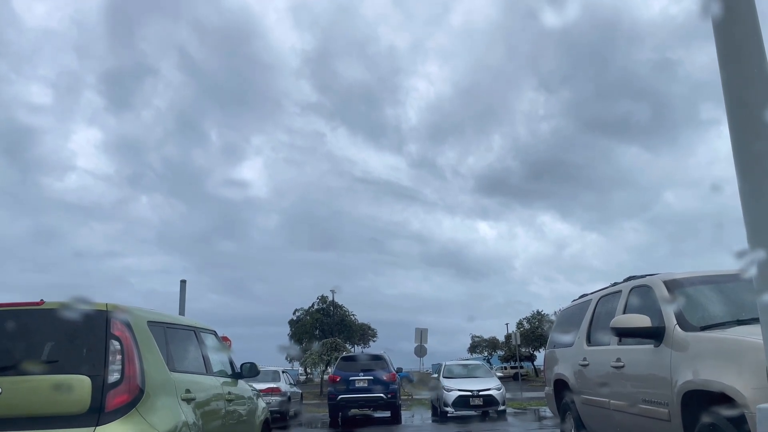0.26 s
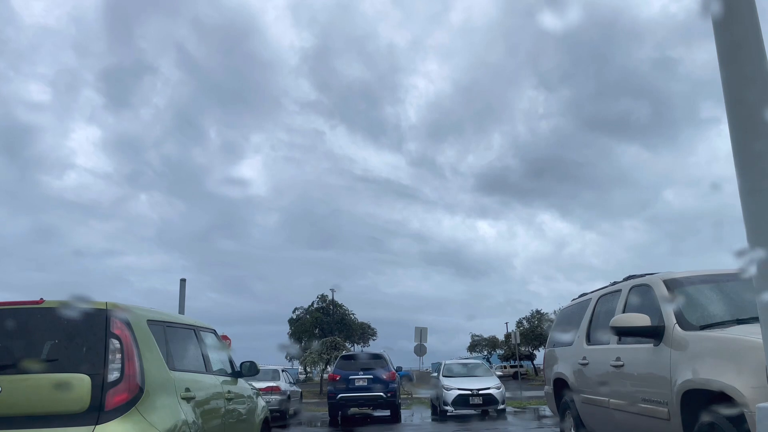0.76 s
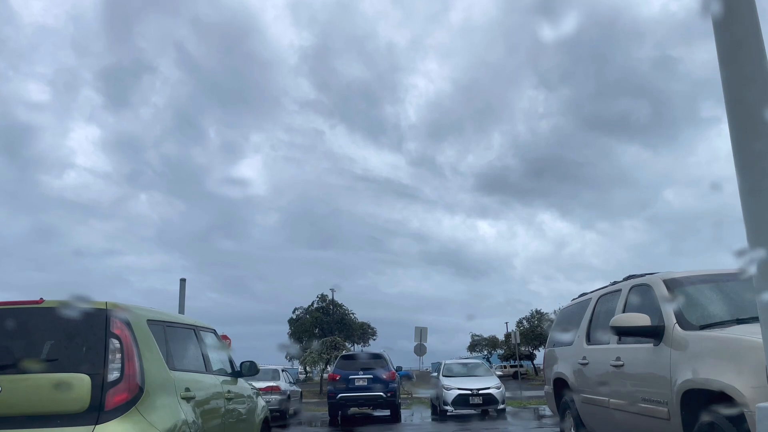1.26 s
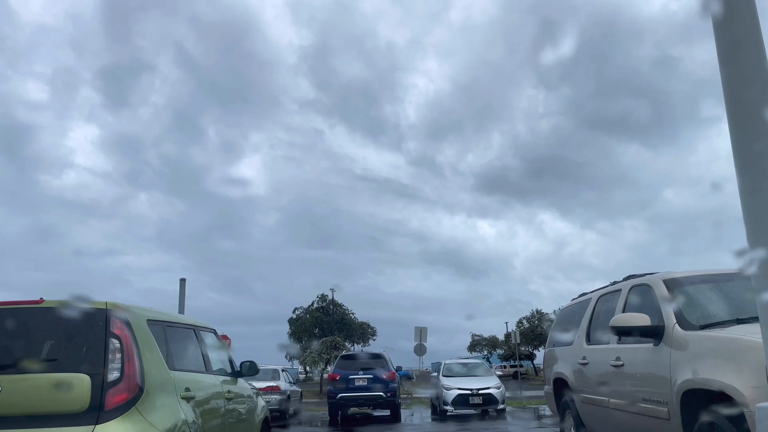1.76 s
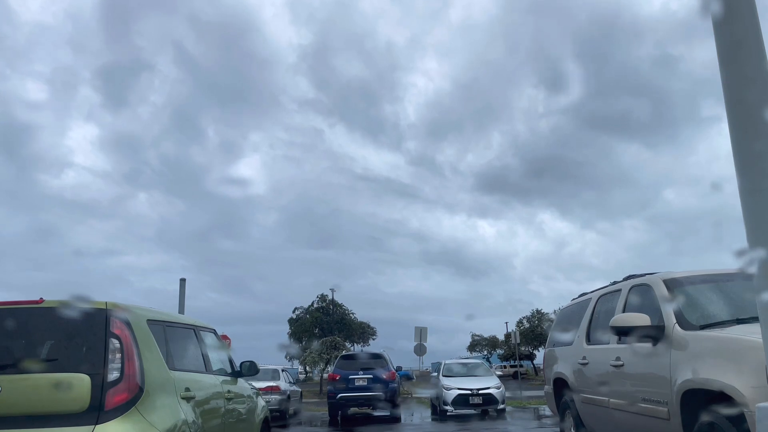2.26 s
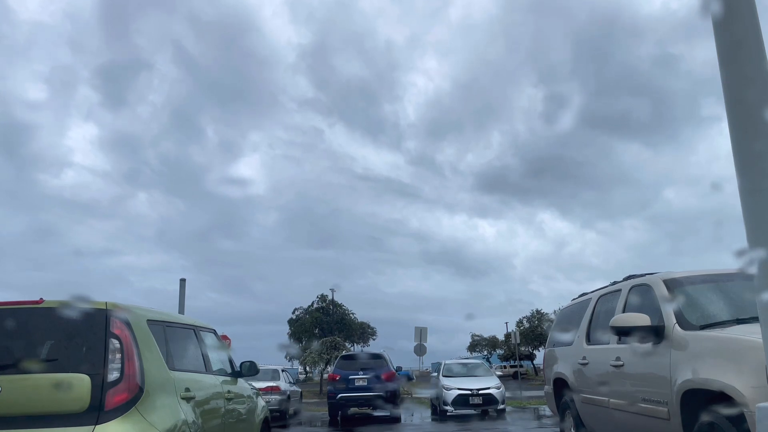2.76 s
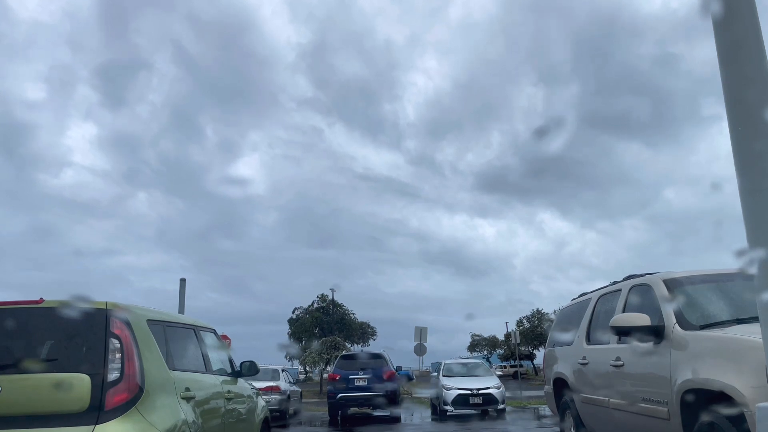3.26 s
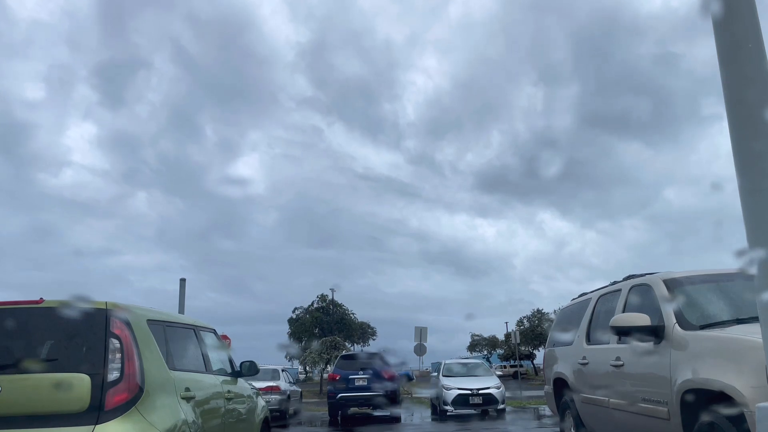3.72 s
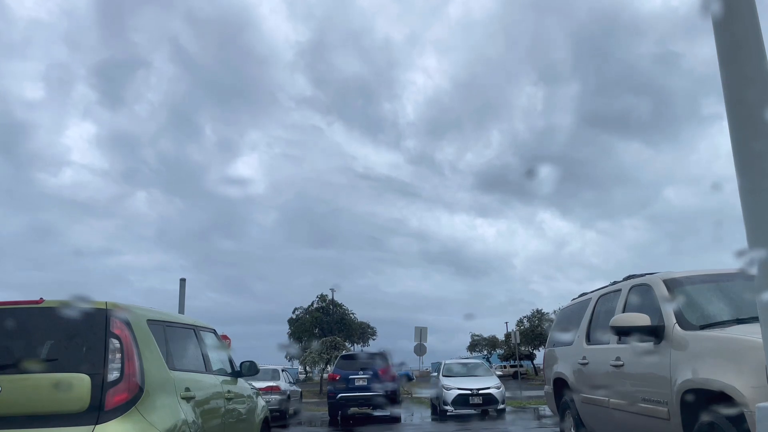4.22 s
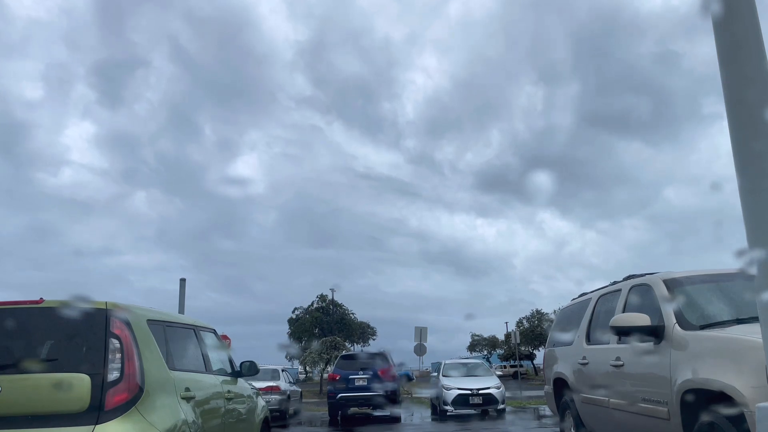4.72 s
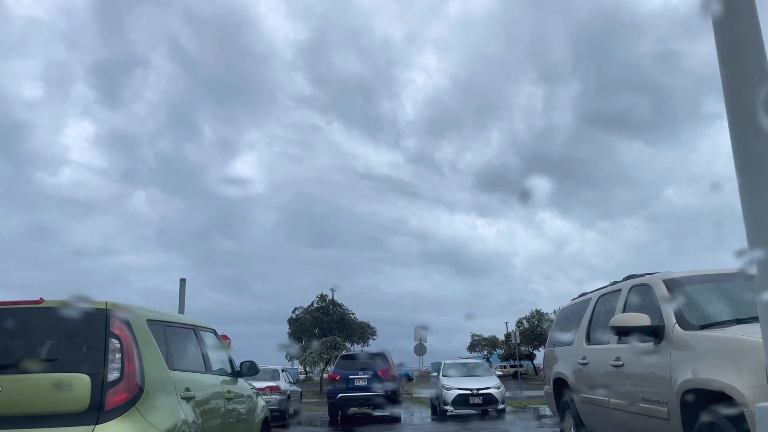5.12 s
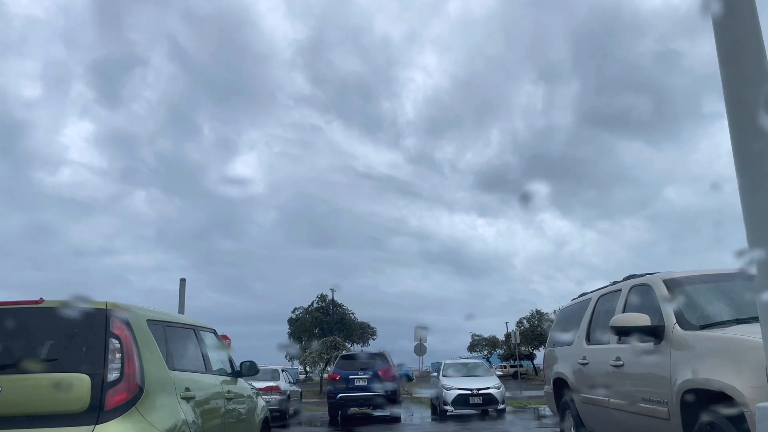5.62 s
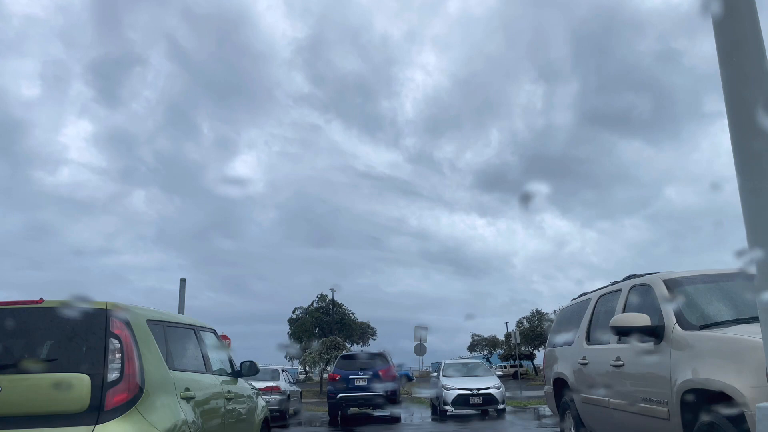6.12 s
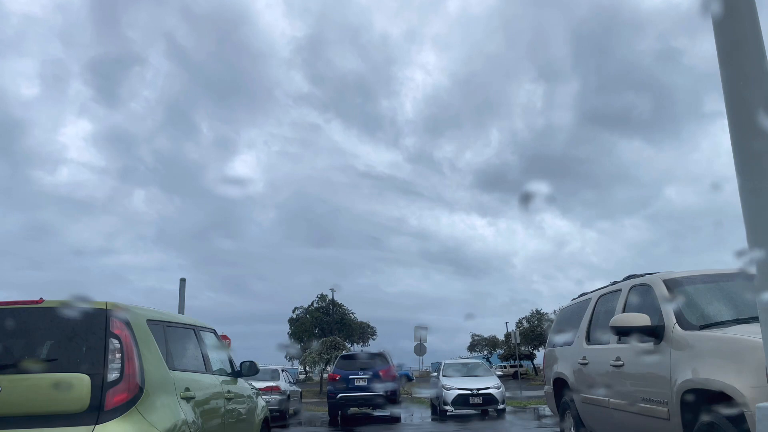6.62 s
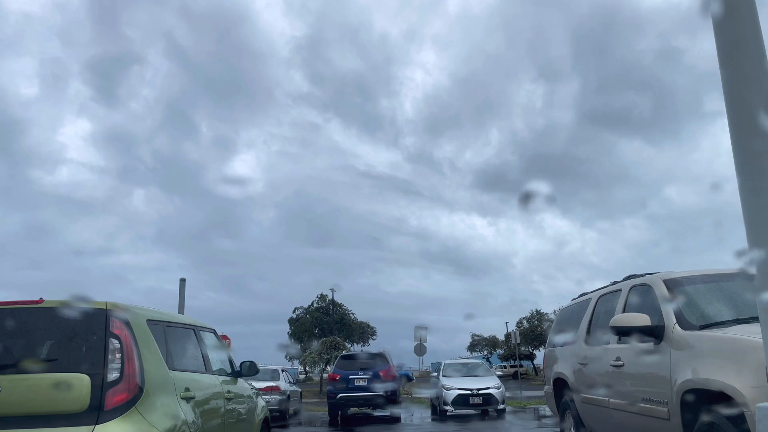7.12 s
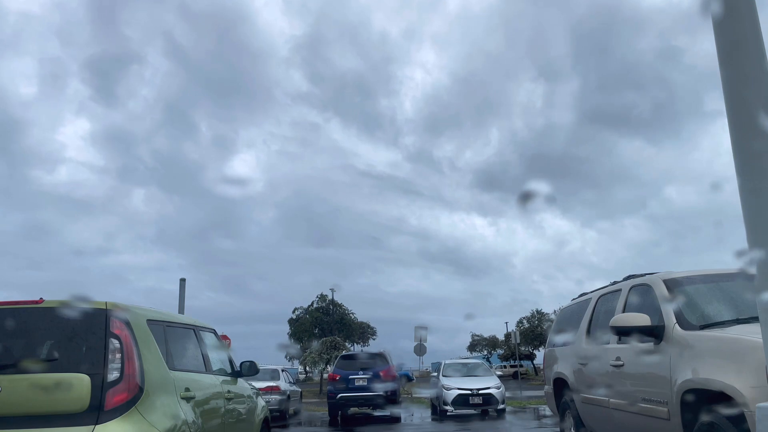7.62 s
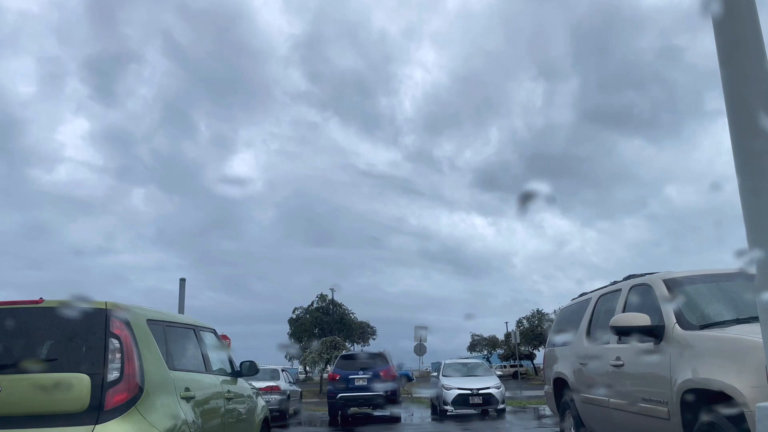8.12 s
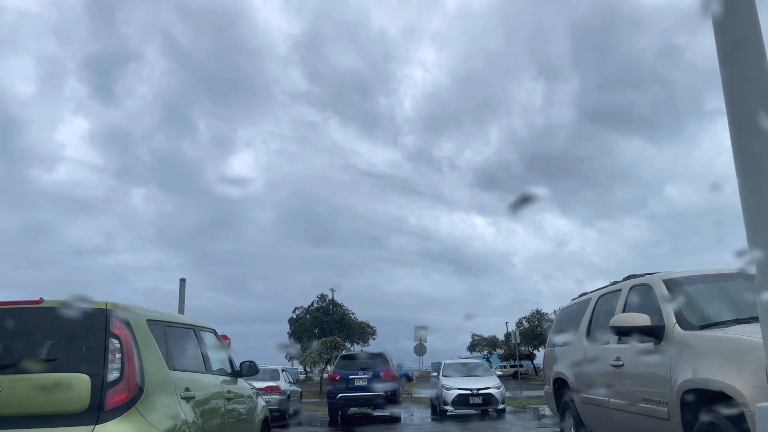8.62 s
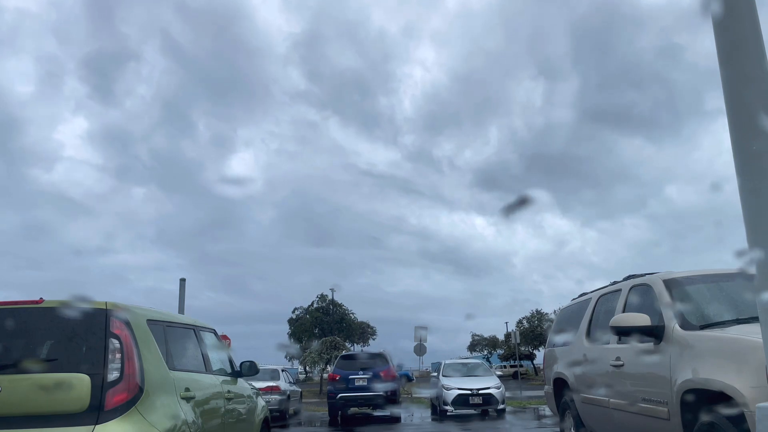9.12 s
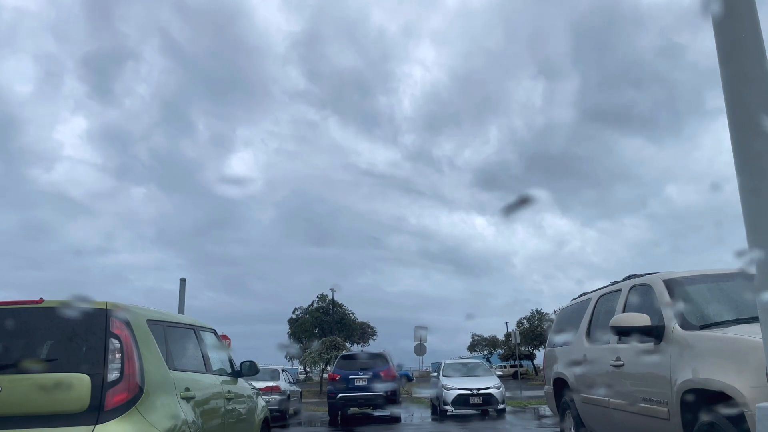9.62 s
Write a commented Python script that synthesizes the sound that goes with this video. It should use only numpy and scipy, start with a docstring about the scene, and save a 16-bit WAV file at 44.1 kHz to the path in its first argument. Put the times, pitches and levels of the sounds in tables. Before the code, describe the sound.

A vehicle hisses away on wet road, rain ticks on a windshield, then bumps, a faint squeak and sharp plastic knocks sound inside the car.

```python
"""Hard, plastic-sounding knocks close by, inside a parked car in light rain: chains of tiny impacts ring a panel.
Around them come soft bumps, a faint squeak and rustling of slipping surfaces, and a short rattle of ringing modes.
Small drops, bursts of coloured noise, tick on the windshield; outside, shaped noise makes a wash of rain.
A vehicle hisses by on the wet road a few metres off, trailing spray, and fades with distance.
Narrow bands of noise fill the closed cabin with a low rumble, and a far motor hums in sine tones."""
import sys
import numpy as np
from scipy import signal
from scipy.fft import rfft, irfft, next_fast_len
from scipy.io import wavfile
from scipy.ndimage import uniform_filter1d, map_coordinates

SR = 44100
rng = np.random.default_rng(int(sys.argv[2]) if len(sys.argv) > 2 else 0)


def wav_record(signal):
    """Record a signal, one row per channel, as 16-bit PCM in the file named by sys.argv[1]."""
    frames = np.transpose(np.atleast_2d(signal))
    bounded = np.clip(frames, -1, 1)
    # unit amplitude maps onto the largest positive 16-bit level
    quanta = np.round(bounded * 32767).astype(np.int16)
    wavfile.write(sys.argv[1], SR, quanta)


N = 435266

# Rumble of the traffic around the car park. Each row: time in seconds, reference level in dB.
TRAFFIC_LEVEL = [(0, -38.5), (1.8, -29.5), (2.25, -36.5), (2.9, -31.5), (3.7, -36.5), (5.9, -37),
                 (6.4, -33.5), (6.6, -41.5), (7.9, -41.5), (8.7, -40.5), (9.87, -41.5)]
# Colours of the outside sounds. Each row: frequency in Hz, relative level in dB.
BOOM_COLOUR = [(30, -81), (50, -12), (58, 9), (64, 19.5), (70, 14), (78, 7.5), (92, -12), (130, -77.5)]
DEEP_COLOUR = [(12, -28), (25, -17), (34, -15.5), (43, 7), (51, 12), (58, 1), (75, -54), (110, -93.5)]
ROAD_COLOUR = [(60, -64.5), (92, -2.5), (116, 5), (140, -6), (180, -4.5), (215, -9), (285, -7.5),
               (340, -9.5), (430, -19), (560, -30), (900, -28.5), (2000, -82.5)]
TYRE_COLOUR = [(250, -36.5), (480, -15), (700, -0.5), (900, 1), (1170, 6.5), (1380, -2), (1700, -2.5),
               (2300, -5.5), (2600, -10.5), (3300, -6), (4500, -17.5), (6200, -25), (7500, -54),
               (12000, -65)]
DRIZZLE_COLOUR = [(250, -26), (500, -4.5), (700, 1.5), (1100, -15.5), (1350, -1), (1650, -8), (2300, -9),
                  (3300, -16.5), (4400, -17), (5500, -18), (6600, -24.5), (7600, -37.5), (10000, -29),
                  (13500, -40.5)]
# Cabin resonances that colour the outside hiss. Each row: centre in Hz, width in Hz, relative level in dB.
CABIN_MODES = [(862, 56, 5.5), (1065, 74, 5.5), (1171, 52, 4), (1560, 140, -3), (1674, 44, -6),
               (1894, 25, -2), (2230, 140, -7), (2296, 25, -3.5), (2920, 150, -8.5), (3360, 29, -14.5),
               (4730, 480, -23.5), (6260, 74, -26.5)]
# Far motor. Each row: time in seconds, firing rate in Hz.
MOTOR_RATE = [(0, 66.1), (1.2, 65.1), (2.2, 65.54), (2.95, 68.94), (3.3, 75.8), (4.4, 81.4), (5.3, 75.97),
              (5.7, 70.2), (6.3, 69.14), (7, 64.22), (9.87, 61.91)]
# Its tones. Each row: multiple of the firing rate, level in dB relative to TRAFFIC_LEVEL.
MOTOR_TONES = [(1, -8.5), (2, -22.5), (4, -24)]
# Left-right likeness of outside, then close noise. Each row: frequency in Hz, correlation from -1 to 1.
FAR_LIKENESS = [(60, 1), (130, 0.9), (280, 0.27), (600, -0.23), (1150, -0.71), (1700, 0.24), (2800, 0.66),
                (6000, -0.14), (12800, 0.68)]
NEAR_LIKENESS = [(60, 0.86), (200, .76), (400, 0.35), (1100, 0.095), (2000, 0.73), (4000, 0.56),
                 (6000, 0.33), (7300, 1), (9300, 0.32), (11000, 0.93), (12800, 0.94)]
# Left-right balance of outside, then close sounds. Each row: frequency in Hz, left minus right in dB.
FAR_BALANCE = [(60, -0.2), (130, 5.5), (200, -2.5), (330, 0), (550, 2.5), (1150, -3), (2000, 2.5),
               (4000, 1.4), (8000, 1)]
NEAR_BALANCE = [(60, -1.5), (160, 0.5), (400, 2.5), (1300, 0), (1850, -6), (2250, 1.5), (3200, 2),
                (4300, 2), (6000, 1), (8000, 0)]
# Left-right phase turn of the close sounds; above about 6 kHz it comes from the stereo recorder. Each row:
# frequency in Hz, left minus right phase in radians.
NEAR_PHASE_TURN = [(200, 0), (700, 1.07), (1100, 0.56), (1550, 1.4), (2100, 0.5), (2900, 1.4),
                   (4500, 0.27), (5600, -0.35), (6300, -2.5), (7000, -3), (7900, -3), (9000, -4.5),
                   (10400, -5.5), (11800, -7), (13000, -8.5)]
# Biggest drops on the glass. Each row: start in seconds, level in dB before a shared trim,
# brightness in dB per octave.
BIG_DROPS = [(.545, -58, -13.5), (.669, -59.5, -11), (1.526, -64.5, -4.5), (1.558, -58, -3.5),
             (2.051, -66, -11), (2.191, -62, -6), (2.217, -67, -10), (2.807, -67, -11), (2.847, -57.5, -13),
             (3.06, -70, -7), (3.136, -74, -10), (3.272, -59, -10), (3.633, -54.5, -11), (3.951, -58, -8.5),
             (4.018, -61.5, -7), (4.156, -58, -8.5), (4.486, -67, -6.5), (4.553, -73, -3), (4.952, -71, -5),
             (5.254, -60, -8.5), (5.75, -60.5, -6.5), (6.014, -58.5, -11), (6.047, -59, -2.5),
             (6.109, -61.5, -9), (6.151, -61.5, -5.5), (6.201, -66, -4), (6.297, -68, -14),
             (6.802, -73, -6), (6.901, -55, -12), (7.016, -58.5, -15.5), (7.086, -56.5, -6),
             (7.582, -63, -6.5), (7.853, -59.5, 1.5), (7.879, -58.5, 1.5), (8.502, -62, -8),
             (8.565, -52, -12.5), (9.635, -53, -9)]
# Colour of a drop, and of a knock's first crack. Each row: frequency in Hz, relative level in dB.
SPLAT_COLOUR = [(200, -22.5), (700, -5.5), (2000, -5), (3500, 0), (5600, -2.5), (6700, -7), (7600, -9),
                (9500, -8), (12500, -16.5), (14500, -18)]
# Heavy bumps that rock the car's body. Each row: start in seconds, level in dB.
BODY_JOLTS = [(4.833, -25.5), (8.131, -28.5), (9.279, -38)]
# Surfaces rubbing close by. Each row: start in seconds, length in seconds, level in dB.
RUB_EVENTS = [(2.55, 0.22, -63), (3.82, 0.13, -64), (4.681, 0.22, -65.5), (8.101, 0.45, -56),
              (9.206, 0.23, -54)]
# Colour of the rubbing. Each row: frequency in Hz, relative level in dB.
RUB_COLOUR = [(300, -3), (900, 12), (2000, -0.5), (3300, -2), (5500, -5), (7500, -12), (10500, -24),
              (13500, -19)]
# Nudges to a loose part. Each row: start in seconds, level in dB before the levels of its modes.
RATTLE_NUDGES = [(8.217, -50), (8.256, -45), (8.319, -44.5), (8.347, -38), (8.375, -48), (8.403, -40.5)]
# Modes of the loose part. Each row: frequency in Hz, relative level in dB, 60 dB decay in seconds.
LOOSE_MODES = [(219.2, 7.5, 0.22), (605, 0, 0.1), (682, 1.5, 0.13), (1095, -3.5, 0.061), (1126, -1, 0.13),
               (2360, -8.5, 0.1)]
# Bumps and knocks close by, all levels before shared trims. Each row: start in seconds,
# contact length in seconds, level in dB, brightness in dB per octave, low thud in dB,
# strongest ring in Hz, its level in dB, left minus right in dB.
KNOCK_EVENTS = [(2.562, .01, -56.5, -4, -38.5, 1440, -52, 4), (2.577, .005, -67, -9, -34, 377, -31, 1),
                (2.589, 0.001, -57, -6, -34, 585, -36, 0.5),
                (2.605, 0.0018, -59.5, -12, -34.5, 119, -26.5, -2),
                (2.621, 0.0068, -71, -2, -31, 296, -30, 2),
                (2.63, 0.005, -64.5, -17, -37.5, 387, -27.5, -2), (2.647, .002, -70, -7, -39, 250, -31, 0),
                (2.672, 0.0029, -56, 1, -36, 1290, -51, 2), (2.722, .033, -57, 0.5, -33.5, 3970, -52, 3),
                (2.75, 0.0034, -80, -16, -41, 310, -30, 2.5), (2.777, 0.004, -76.5, -4, -41, 210, -35.5, 4),
                (2.787, 0.0018, -78, -12, -40, 99, -19, -2), (3.87, .027, -63.5, -1, -41.5, 3940, -49, 3.5),
                (3.895, 0.0205, -74, -8, -49, 392, -44, 0),
                (4.619, 0.0068, -68.5, -0.5, -43.5, 452, -47, 1),
                (4.694, .016, -65, -10, -51, 1160, -47, -1), (4.708, 0.0165, -73, -11, -46.5, 476, -37, 4),
                (4.737, .012, -74.5, -12, -51.5, 490, -50, -5), (4.77, .008, -74, -11, -42, 590, -49, 3),
                (4.785, 0.0049, -76, -12, -42, 156, -28, 6), (4.804, .036, -63.5, -1.5, -41, 563, -47, 8.5),
                (4.861, .012, -80, -9, -35, 130, -36.5, 6), (7.206, 0.0024, -46.5, -3, -42, 1980, -54, 3),
                (7.211, 0.0028, -64, -10, -39.5, 353, -32, 3),
                (7.284, .013, -37, -0.6, -40, 4100, -44, 4.5),
                (7.288, .00385, -46.5, -1, -45, 1410, -30, 7),
                (7.308, 0.00984, -50.5, -4, -42.5, 640, -32, 2),
                (8.099, 0.0013, -58, -3, -46, 673.3, -52, 6), (8.11, 0.025, -63, 4.5, -48, 2400, -60, -1),
                (8.127, 0.0033, -44, -4, -37, 1160, -43, 4.5),
                (8.133, .024, -44.5, -1.8, -33.5, 2170, -45, 0),
                (8.214, .0067, -49.5, -8.5, -31, 1040, -35, 4.5),
                (8.217, 0.0018, -59, -12, -47, 288, -26.5, 0),
                (8.237, 0.0037, -44.5, 0, -39, 5370, -39, 1.5), (8.25, .012, -52.5, -4, -34, 630, -28, 4),
                (8.276, 0.028, -62, -8, -46, 1118, -45, 0), (8.31, 0.01, -50, -6, -34.5, 615, -48, 5),
                (8.34, .002, -50, 1, -46, 5530, -39, 5), (8.342, 0.00317, -45, -1.5, -47, 2770, -32, 2),
                (8.365, 0.037, -59, -6, -49, 1094, -51, 6),
                (8.403, 0.0041, -49, -6.5, -39.5, 560, -33.5, 1),
                (8.947, 0.0019, -33, 2.5, -35.5, 5260, -21, 1),
                (8.948, 0.0023, -47.5, -8.5, -31.5, 1780, -17, -5),
                (8.974, 0.004, -40, 1, -49, 5230, -38, -8), (8.99, 0.058, -48.5, -4.5, -54, 1940, -52, -3),
                (9, 0.013, -61.5, -9, -49, 164, -37, 3),
                (9.071, .0063, -41.5, -4.5, -51.5, 2080, -46, -1.5),
                (9.122, 0.038, -61, -6, -61.5, 2250, -56, -2),
                (9.227, 0.022, -53.5, -5.5, -57, 3070, -57, -4.5),
                (9.263, 0.0048, -34, 0.5, -48.5, 4040, -26, -9), (9.273, 0.002, -32, -2, -35, 3410, -17, 2),
                (9.277, .004, -30.5, -1, -29, 1850, -17.5, -3),
                (9.287, 0.0033, -45, -4, -36.5, 440, -28, -3),
                (9.306, .003, -52, -9, -39.5, 171, -32.5, -5),
                (9.359, 0.0011, -37, -3.5, -40, 1700, -17, -4.5),
                (9.38, .004, -48.5, -3, -31.5, 405, -30, -2),
                (9.408, 0.00084, -44, -2, -44, 1650, -25, -4.5),
                (9.4192, .002, -31, -1, -36, 3360, -25, -6.5), (9.428, 0.0038, -46, -1, -39, 528, -28.5, 1)]
# Ring of the struck panel. Each row: centre in Hz, width in Hz, relative level in dB.
PANEL_MODES = [(205, 24, -1.5), (318, 34, -9), (437.4, 88, 5), (559, 50, -2.5), (670, 35.5, 1),
               (749, 18, -4), (870, 47, -8.5), (1145, 40, 0.5), (1341, 26, 2.5), (1480, 65, -1.5),
               (1680, 37, 0), (1880, 46, -4), (1970, 70, -0.5), (2177, 130, -1), (2710, 63, -4),
               (3363, 25, 3), (3440, 28, -5.5), (3870, 23, 2), (4400, 59, -7.5), (4960, 48, 3),
               (5240, 50, 3), (5300, 45, 4.5), (5600, 110, -8), (8570, 480, -9), (10260, 460, -23.5)]
# Broad colour of a contact. Each row: frequency in Hz, relative level in dB.
CONTACT_COLOUR = [(40, 4.5), (120, 17.5), (450, 3.5), (1000, 1), (2600, -0.5), (5500, 1), (6500, 1.5),
                  (7600, 0.5), (8800, -5), (10500, -5.5), (12500, -9.5), (14200, -14.5)]
# Decay inside the cabin. Each row: frequency in Hz, 60 dB decay in seconds.
CABIN_DECAY = [(100, 0.12), (400, 0.12), (1500, 0.075), (5000, 0.091), (12000, 0.026)]
# Thud, knock, clack and snap. Each row: low edge in Hz, high edge in Hz, build-up in seconds,
# lag in seconds, gain in dB, share of the panning.
REGISTERS = [(80, 330, 0.011, 0.00703, -0.5, 0.13), (259, 934, 0.0045, 0.003064, -1, 0.92),
             (820, 3230, 0.0015, 0.00042, 1.5, 0.45), (2660, 14300, 0.00093, 0.0016, 4.5, 0.0078)]

PASS_S, PASS_M, SPEED_M_PER_S = 0.21, 6.36, 9.86  # passing vehicle: time and distance when nearest, speed
IDLE_HZ, IDLE_DB = 110.5, -61  # hum of an idling engine
TOP_HZ = 13700  # microphone's band limit


def amp(db):
    """Gain for a level in dB."""
    return 10 ** (np.asarray(db) / 20)


def unit(x):
    """Scale a signal to rms 1."""
    return x / np.sqrt(np.mean(x ** 2) + 1e-20)


def die_away(t, t60):
    """Exponential decay that falls 60 dB in t60 seconds."""
    return amp(-60 * t / t60)


def build_up(t, rise_s):
    """Exponential approach to full level."""
    return 1 - np.exp(-t / rise_s)


def along(points, hz):
    """Read a (Hz, value) curve on a logarithmic frequency axis."""
    f, v = np.transpose(points)
    return np.interp(np.log(hz + 1), np.log(f + 1), v)


def over_time(rows):
    """Read a (seconds, value) curve at every sample."""
    s, values = np.transpose(rows)
    return np.interp(np.arange(N) / SR, s, values)


def bell(hz, centre_hz, octaves):
    """A smooth hump of height 1 on a logarithmic frequency axis."""
    return np.exp(-(np.log2((hz + 1) / centre_hz) / octaves) ** 2)


def band(hz, low_hz, high_hz, order):
    """Band-pass gain with steep skirts."""
    return 1 / np.sqrt((1 + (low_hz / (hz + 1)) ** order) * (1 + (hz / high_hz) ** order))


def resonances(modes, hz):
    """Summed power response of (Hz, width, dB) modes."""
    return sum(amp(db) ** 2 / (1 + (2 * (hz - centre) / width) ** 2) ** 1.6 for centre, width, db in modes)


def ripple(depth_db, spacing_hz):
    """Many close standing waves: a fixed, irregular gain over frequency."""
    knots = rng.standard_normal(2048)
    return lambda hz: amp(depth_db * np.interp(hz / spacing_hz, np.arange(len(knots)), knots))


def wobble(rate):
    """A smooth random curve with rate knots a second."""
    knots = rng.standard_normal(int(N * rate / SR) + 4)
    return map_coordinates(knots, [np.arange(N) * rate / SR])


def crackle(depth_db, size, rate=1400):
    """A gain that moves in straight lines between random levels, rate of them a second."""
    knots = rng.standard_normal(2048)
    return amp(depth_db * np.interp(np.arange(size) * rate / SR, np.arange(len(knots)), knots))


def filtered(x, response):
    """Filter a signal by a response given over frequency."""
    n = x.shape[-1]
    m = next_fast_len(n + SR // 10)
    return irfft(rfft(x, m) * response(np.fft.rfftfreq(m, 1 / SR)), m)[..., :n]


def noise(gain, alike, size):
    """Stereo noise of rms 1 whose mid and side shares set the left-right likeness."""
    m = next_fast_len(size)
    hz = np.fft.rfftfreq(m, 1 / SR)
    turn = np.arccos(np.clip(along(alike, hz), -1, 1)) / 2
    white = rfft(rng.standard_normal((2, m)))
    mid, side = irfft(white * gain(hz) * [np.cos(turn), np.sin(turn)], m)[:, :size]
    return unit(np.array([mid + side, mid - side]))


def rush(colour):
    """Steady outside noise through the whole scene."""
    return noise(lambda hz: amp(along(colour, hz)), FAR_LIKENESS, N)


def steadied(x, span):
    """Noise with its own slow swells evened out over span seconds."""
    power = uniform_filter1d(np.mean(x ** 2, 0), int(span * SR) + 1)
    return x / np.sqrt(np.abs(power) + 1e-3)


def panned(left_db):
    """Left and right gains for a left-minus-right level."""
    return amp(np.outer([.5, -.5], left_db))


def add(track, s, sound):
    """Mix a sound in at time s."""
    part = track[:, max(round(s * SR), 0):][:, :sound.shape[1]]
    part += sound[:, :part.shape[1]]


def tone(hz, t60, t, attack_s, spread=0.72):
    """One mode rings and dies; its phase differs a little from left to right."""
    phase = 2 * np.pi * rng.random() + spread * rng.standard_normal((2, 1))
    return np.sin(2 * np.pi * hz * t + phase) * die_away(t, t60) * build_up(t, attack_s)


def nearness(lead_s=0):
    """Gain of the passing vehicle: 1 at its nearest, falling as one over distance."""
    along_road_m = SPEED_M_PER_S * (np.arange(N) / SR - PASS_S + lead_s)
    return PASS_M / np.hypot(PASS_M, along_road_m)


def rumble(boom_db=-1.5, deep_db=-8, pass_boom_db=-25, pass_deep_db=-30.0, lead_s=0.22, boom_falloff=3.6):
    """Low engine and road sound throbs in the cabin's lowest air modes; the passing engine leads its tyres."""
    around_db = over_time(TRAFFIC_LEVEL)
    boom = np.hypot(amp(around_db + boom_db), amp(pass_boom_db) * nearness(lead_s) ** boom_falloff)
    deep = np.hypot(amp(around_db + deep_db), amp(pass_deep_db) * nearness())
    return boom * steadied(rush(BOOM_COLOUR), span=.4) + deep * steadied(rush(DEEP_COLOUR), span=0.56)


def hum(hz, db, waver=0.0042, flutter_db=0.47):
    """One slightly unsteady engine tone."""
    phase = 2 * np.pi * np.cumsum(hz * (1 + waver * wobble(5.0))) / SR
    return amp(db + flutter_db * wobble(8)) * np.sqrt(2) * np.sin(phase)


def motor():
    """A far motor speeds up and settles, its tones at multiples of the firing rate; another engine idles."""
    hz, around_db = over_time(MOTOR_RATE), over_time(TRAFFIC_LEVEL)
    return sum(hum(round(k) * hz, around_db + db) for k, db in MOTOR_TONES) + hum(IDLE_HZ, IDLE_DB)


def patchy(x):
    """The wet hiss comes in patches: each band swells and sinks on its own."""
    z = signal.stft(x, nperseg=512)[2]
    across_bands = uniform_filter1d(rng.standard_normal(z.shape[1:]), 7, 0)
    field = uniform_filter1d(across_bands, 12, 1)
    return signal.istft(z * amp(1.5 * unit(field)), nperseg=512)[1][:, :N]


def traffic(drizzle_db=-65, shell_db=5, grain_db=1, road_db=-48.0, pass_road_db=-38, tyres_db=-50.5,
            far_tyres_db=-68, falloff=1.21, lead_s=0.13):
    """Road drone and the hiss of wet tyres fade with distance into the grainy wash of the rain."""
    road_gain = np.hypot(amp(road_db), amp(pass_road_db) * nearness(lead_s))
    road = road_gain * amp(0.56 * wobble(5.5)) * rush(ROAD_COLOUR)
    waves = ripple(2, 28)

    def inside(colour, modes_db):
        """Hiss coloured by the cabin's resonances and standing waves."""
        def gain(hz):
            power = amp(along(colour, hz)) ** 2 + amp(modes_db) ** 2 * resonances(CABIN_MODES, hz)
            return waves(hz) * np.sqrt(power)
        return noise(gain, FAR_LIKENESS, N)

    tyre_gain = np.hypot(amp(far_tyres_db), amp(tyres_db) * nearness() ** falloff)
    tyres = tyre_gain * amp(1.3 * wobble(12)) * inside(TYRE_COLOUR, shell_db)
    wash_gain = amp(drizzle_db + 0.49 * wobble(13) + grain_db * wobble(110))
    wash = wash_gain * inside(DRIZZLE_COLOUR, shell_db - 8.0)
    return road + patchy(tyres + wash)


def exhausts(pass_db=-41, pass_hz=140, pass_octaves=.36, falloff=1.8, surge_db=3.5,
             growl_db=-58, growl_hz=440, growl_octaves=0.5):
    """The passing vehicle's exhaust burbles in uneven surges; the far motor growls while it runs fast."""
    rate = over_time(MOTOR_RATE)
    speed = (rate - rate.min()) / np.ptp(rate)
    burble_noise = noise(lambda hz: bell(hz, pass_hz, pass_octaves), FAR_LIKENESS, N)
    burble = amp(pass_db + surge_db * wobble(13)) * nearness() ** falloff * burble_noise
    growl_noise = noise(lambda hz: bell(hz, growl_hz, growl_octaves), FAR_LIKENESS, N)
    growl = amp(growl_db + 1.5 * wobble(9)) * speed * growl_noise
    return burble + growl


def spray(db=-55, trail_s=0.37, falloff=6, centre_hz=1600, octaves=0.55):
    """The water thrown up behind the vehicle passes a moment after it, as a hump of hiss."""
    def colour(hz):
        return np.sqrt(resonances(CABIN_MODES, hz)) * bell(hz, centre_hz, octaves)
    return amp(db) * nearness(-trail_s) ** falloff * noise(colour, FAR_LIKENESS, N)


def drops(big_db=5, small_db=-68, spread_db=3.5, splash_db=-14, splash_t60=0.22, big_t60=0.11,
          small_t60=0.057, small_tilt_db=-7, count=90):
    """A big drop ticks in the colour of the spot it hits, and splashes; many finer ones tick more briefly."""
    track, t = np.zeros((2, N)), np.arange(SR // 6) / SR
    tick_and_splash = die_away(t, big_t60) + amp(splash_db) * die_away(t, splash_t60)
    tick = die_away(t, small_t60)
    hits = [(s, db + big_db, tilt_db, tick_and_splash) for s, db, tilt_db in BIG_DROPS]
    for place, size, hardness in rng.random((count, 3)):
        db = small_db - spread_db * np.log(1.05 - size)  # few of the fine drops are loud
        hits.append((place * N / SR, db, small_tilt_db + 6 * (hardness - .5), tick))
    for s, db, tilt_db, decay in hits:
        spot = ripple(3, 550)

        def colour(hz):
            return spot(hz) * amp(along(SPLAT_COLOUR, hz) + tilt_db * np.log2((hz + 300) / 3500))
        splat = noise(colour, NEAR_LIKENESS, len(t))
        add(track, s, amp(db) * build_up(t, 0.0002) * decay * splat)
    return track


def squeak(s=2.658, length=0.11, start_hz=905, end_hz=715, db=-53):
    """Something slides between two bumps with a short, unsteady, falling squeak."""
    track, u = np.zeros((2, N)), np.linspace(0, 1, int(length * SR))
    hz = (start_hz + (end_hz - start_hz) * u) * (1 + 0.023 * wobble(200)[:len(u)])
    swell = crackle(3, len(u), rate=170) * np.sin(np.pi * u)
    sound = amp(db) * swell * np.sin(2 * np.pi * np.cumsum(hz) / SR)
    add(track, s, sound[None])
    return track


def rustle(grain_db=4, edge=0.5):
    """Surfaces rub in a dense run of tiny slips that swells and fades."""
    track = np.zeros((2, N))
    for s, length, db in RUB_EVENTS:
        n = int(length * SR)
        rub = noise(lambda hz: amp(along(RUB_COLOUR, hz)), NEAR_LIKENESS, n)
        slips = crackle(grain_db, n, rate=600) * crackle(2.3, n, rate=64) * rub
        add(track, s, amp(db) * np.hanning(n) ** edge * unit(slips))
    return track


def rattle(left_db=2.0, attack_s=.003, scatter_db=2):
    """A loose part is nudged again and again, so that its few modes ring on between the knocks."""
    track, t = np.zeros((2, N)), np.arange(SR // 3) / SR
    for s, db in RATTLE_NUDGES:
        for hz, mode_db, t60 in LOOSE_MODES:
            strength = amp(db + mode_db + scatter_db * rng.standard_normal())
            add(track, s, strength * tone(hz, t60, t, attack_s))
    return track * panned(left_db)


def jolts(rise_s=0.012, t60=0.44, low_hz=38, high_hz=85):
    """A heavy bump sets the cabin air booming for a moment, as a swell of low noise."""
    track, t = np.zeros((2, N)), np.arange(SR // 2) / SR
    swell = build_up(t, rise_s) * die_away(t, t60)
    for s, db in BODY_JOLTS:
        boom = noise(lambda hz: band(hz, low_hz, high_hz, 12), FAR_LIKENESS, len(t))
        add(track, s, amp(db) * swell / swell.max() * steadied(boom, span=0.07))
    return track


def chatter(length, t, rate=380, spread_db=3):
    """Power of the tiny impacts that make up one contact; they tend to grow as the surfaces bite."""
    place, size = rng.random(40), rng.standard_normal(40)
    n = int(np.clip(1 + length * rate, 1, len(place)))
    k = np.arange(n)
    when = length * (k + place[:n] * (k > 0)) / n  # the first impact falls at the very start
    return np.bincount((when * SR).astype(int), amp(spread_db * size[:n]) ** 2 * np.sqrt(k + 1), len(t))


def first_crack(length, t, db=13, soft_s=0.0034, lag_s=0.0012, width_s=0.00035):
    """A sudden contact opens with one sharp crack; a slow, scraping one has almost none."""
    t = t[:SR // 100]
    burst = noise(lambda hz: amp(along(SPLAT_COLOUR, hz)), NEAR_LIKENESS, len(t))
    return amp(db) * np.exp(-length / soft_s) * np.exp(-np.abs((t - lag_s) / width_s)) * burst


def panel_ring(levels, t, ring_db=-16, t60=0.11):
    """The panel's modes ring on after a blow, at new strengths and slightly new pitches each time."""
    hz, _, db = np.transpose(PANEL_MODES)
    blow_db = np.interp(np.log(hz), np.log([140, 400, 950, 4500]), levels)
    strength_db = blow_db + db + 4 * rng.standard_normal(len(hz))
    hz = hz * (1 + 0.012 * rng.standard_normal(len(hz)))
    phase = 2 * np.pi * rng.random((len(hz), 1)) + 0.67 * rng.standard_normal((2, len(hz), 1))
    modes = amp(strength_db + ring_db)[:, None] * np.sin(2 * np.pi * hz[:, None] * t + phase)
    return modes.sum(1) * die_away(t, t60) * build_up(t, 0.0063)


def struck_spot(hz, t, cycles=24, longest_t60=0.068, first_db=3, after_db=-10, after_t60=0.064,
                attack_cycles=0.7):
    """The struck spot gives a hard, short ping; two close modes beat on faintly with it."""
    attack_s = min(attack_cycles / hz, .002)
    pair_hz = hz * (1 + .02 * rng.standard_normal(2))
    ping = tone(hz, min(cycles / hz, longest_t60), t, attack_s, spread=.4)
    beating = sum(tone(f, after_t60, t, 0.0053) for f in pair_hz)
    return amp(first_db) * ping + amp(after_db) * beating


def knocks(tail_db=-26, tail_t60=0.25, direct_db=4, direct_t60=0.01, spot_db=6, spot_octaves=0.21,
           broad_db=-8, favour_db=4.0, favour_octaves=0.31, crackle_db=3):
    """Every tiny impact arrives directly, then dies in the cabin; the lowest register builds up slowest."""
    track, t = np.zeros((2, N)), np.arange(SR // 5) / SR
    mode_hz = np.fft.rfftfreq(next_fast_len(len(t)), 1 / SR)
    panel = np.sqrt(resonances(PANEL_MODES, mode_hz) + amp(broad_db + along(CONTACT_COLOUR, mode_hz)) ** 2)
    centres = np.array([np.sqrt(lo * hi) for lo, hi, *_ in REGISTERS[1:]])
    for s, length, level_db, tilt_db, thud_db, ring_hz, ring_db, left_db in KNOCK_EVENTS:
        impacts = chatter(length, t)
        # a harder contact is brighter, and each spot that is struck favours its own modes
        tilted_db = level_db + tilt_db * np.log2(centres / centres[1])
        levels = [thud_db, *(tilted_db + favour_db * bell(centres, ring_hz, favour_octaves))]
        spot = panel * amp(spot_db * bell(mode_hz, ring_hz, spot_octaves)) * ripple(2, 70)(mode_hz)
        for db, (lo, hi, build, lag, gain_db, share) in zip(levels, REGISTERS):
            raw = noise(lambda hz: spot * band(hz, lo, hi, 10), NEAR_LIKENESS, len(t))
            grain = crackle(crackle_db * lo / REGISTERS[-1][0], len(t))  # coarser in the high registers
            body = unit(steadied(raw, span=0.021) * grain)
            direct = amp(direct_db) * die_away(t, direct_t60)
            cabin = die_away(t, along(CABIN_DECAY, np.sqrt(lo * hi)))
            tail = amp(tail_db) * die_away(t, tail_t60)
            response = (direct + cabin + tail) * build_up(t, build)
            power = np.abs(signal.fftconvolve(impacts, response ** 2)[:len(t)])
            # the level is set over the later part of the contact
            loud = (t > .4 * length) & (t < length + .003 + build)
            envelope = np.sqrt(power / power[loud].mean())
            add(track, s + lag, amp(db + gain_db) * envelope * body * panned(share * left_db))
        add(track, s, amp(levels[-1]) * first_crack(length, t))
        strongest = amp(ring_db) * struck_spot(ring_hz, t)
        add(track, s + length / 2, panel_ring(levels, t) + strongest)
    return track


def scene():
    """Everything as heard inside the cabin; the close sounds differ in phase between left and right, in the
    treble through the stereo recorder."""
    outside = rumble() + motor() + traffic() + exhausts() + spray()
    close = drops() + squeak() + rustle() + rattle() + jolts() + knocks()

    def close_response(hz):
        phase_turn = np.exp(1j * np.outer([.5, -.5], along(NEAR_PHASE_TURN, hz)))
        return panned(along(NEAR_BALANCE, hz)) * phase_turn
    outside = filtered(outside, lambda hz: panned(along(FAR_BALANCE, hz)))
    return outside + filtered(close, close_response)


def record(dry):
    """The microphone keeps almost nothing above its band limit; both ends are ramped over 3 ms."""
    from_end = np.minimum(np.arange(N), np.arange(N)[::-1])
    edges = np.clip(from_end / (.003 * SR), 0, 1)
    return filtered(dry * edges, lambda hz: 1 / np.sqrt(1 + (hz / TOP_HZ) ** 60))


dry = scene()
out = record(dry)
wav_record(out)
```